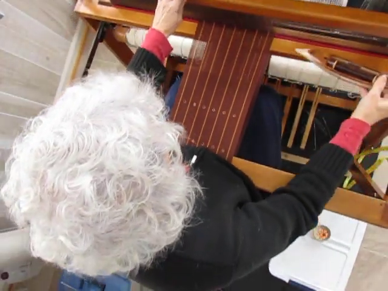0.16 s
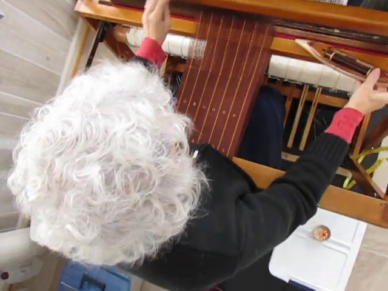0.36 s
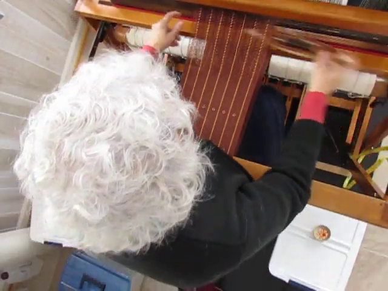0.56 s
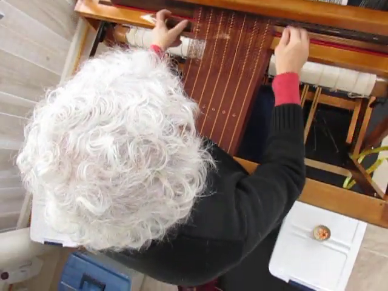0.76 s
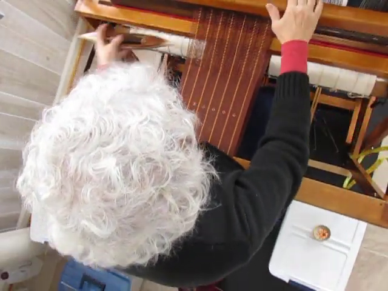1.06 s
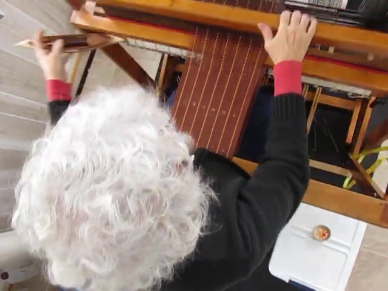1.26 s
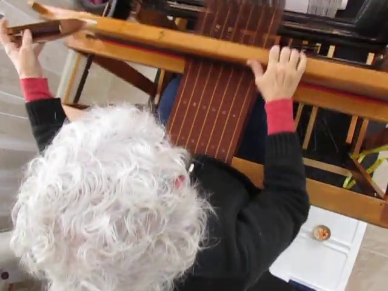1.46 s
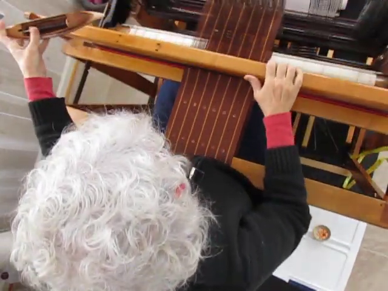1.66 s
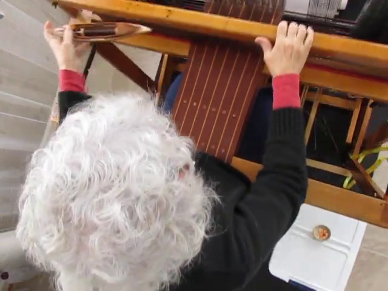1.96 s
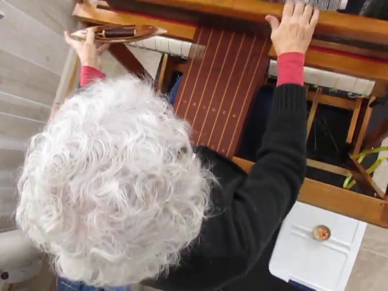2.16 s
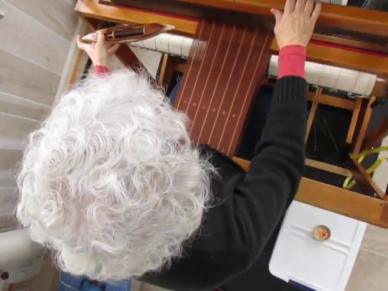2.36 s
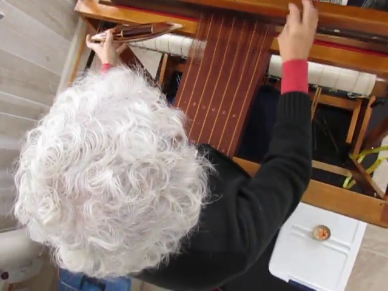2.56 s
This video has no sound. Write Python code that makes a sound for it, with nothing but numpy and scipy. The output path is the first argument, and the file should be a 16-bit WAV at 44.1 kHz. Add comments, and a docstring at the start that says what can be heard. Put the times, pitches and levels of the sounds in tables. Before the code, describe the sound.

Hand weaving on a wooden loom, heard close above in a small lively room: soft thuds, bright shuttle clacks, whirring bobbin, a burst of beater thumps and swishing threads, then ticks and a brief metal squeal.

```python
"""Threads swish and wood scrapes on wood in a small room: a wooden floor loom at work, two microphone ports.
Thuds of beater and treadles ring the frame, joints squeak in narrow noise bands, heddles tick.
The shuttle is thrown from right to left: knocks ring its modes, which are damped and shifted once it is
caught. Its bobbin whirrs in many small taps; later a metal pivot squeals. Shaped noise makes the swish,
scrape, floor rumble and room tone; sparse fading taps make the reverberation of everything else."""
import sys
import numpy as np
from scipy import signal
from scipy.fft import rfft, irfft
from scipy.io import wavfile
from scipy.ndimage import uniform_filter1d

SR = 44100
rng = np.random.default_rng(int(sys.argv[2]) if len(sys.argv) > 2 else 0)


def volts(x):
    """Linear amplitude factor 10**(x/20) for a level x in dB, scalar or array-like."""
    e = np.asarray(x, float) / 20
    return 10 ** e


def wav_out(sig):
    """Save sig, one row per channel (or a flat mono array), as 16-bit PCM at SR to the path in sys.argv[1]."""
    wavfile.write(sys.argv[1], SR, np.round(np.clip(np.atleast_2d(sig).T, -1, 1) * 32767).astype(np.int16))


N = 119070

# likeness of the left and right ports: f/Hz, likeness (1 = identical)
LIKENESS = [(60, 0.88), (300, 0.87), (700, 0.69), (2000, 0.13), (6000, 0.032), (14000, 0.18)]
# modes of the shuttle damped and shifted by the hand: f/Hz, level/dB, t60/s
HELD_MODES = [(1430, -10.5, 0.013), (2392, -0.5, 0.023), (2560, 7, 0.024), (3440, 3.5, 0.014),
              (4230, -4.5, 0.042), (4995, 3, 0.046), (6440, -3, 0.021), (8160, -5, 0.026),
              (11960, -1.5, 0.058)]
CAUGHT_S = 1.05  # from here the hand holds the shuttle


def evened(x):
    """Scales to rms 1."""
    return x / np.sqrt(np.mean(x ** 2) + 1e-20)


def read(points, hz):
    """Reads a spectrum on a log-frequency axis."""
    f, value = np.transpose(points)
    return np.interp(np.log(hz + 1), np.log(f + 1), value)


def curve(rows, column=1):
    """Reads a control curve at every sample."""
    rows = np.array(rows)
    return np.interp(np.arange(N) / SR, rows[:, 0], rows[:, column])


def add(mix, s, sound, pan_db=0):
    """Places a sound, positive pan to the left; the farther port hears it softer and later."""
    samples_per_db = 1.15  # arrival lag between the ports
    for side, sign in enumerate((1, -1)):
        lag = max(-sign * pan_db * samples_per_db, 0)
        part = mix[side, round(s * SR + lag):][:len(sound)]
        part += volts(sign * pan_db / 2) * sound[:len(part)]


def paired(left, other, hz):
    """Blends two independent spectra into a stereo pair with the likeness of the two ports."""
    same = np.clip(read(LIKENESS, hz), -1, 1)[:, None]
    return np.array([left, same * left + np.sqrt(1 - same ** 2) * other])


def hiss(colour, patchy_db, grit_db):
    """Friction and air as stereo noise with drifting patches and short wide flickers."""
    size = 4096 if colour[-1][0] < 1000 else 512  # long windows resolve bass colours
    hop = size // 4
    frames, hz = N // hop + 5, np.fft.rfftfreq(size, 1 / SR)
    a, b, c, d, patches = rng.standard_normal((frames, len(hz), 5)).T
    patches = uniform_filter1d(patches, size=9, axis=0)
    patches = evened(uniform_filter1d(patches, size=10, axis=1))
    z = paired(a + 1j * b, c + 1j * d, hz)
    flicker_db = grit_db * rng.standard_normal(frames)
    z *= volts(read(colour, hz)[:, None] + patchy_db * patches + flicker_db)
    return evened(signal.istft(z, nperseg=size, noverlap=size - hop)[1][:, :N])


def swish():
    """Threads rub through reed and heddles: bright noise."""
    # strength of the rubbing: t/s, level/dB
    strength = [(0, -34.5), (.06, -38), (.12, -34), (.19, -41), (.4, -44), (.45, -32.5), (.58, -48),
                (.63, -35.5), (.8, -54), (.9, -55), (1.06, -68.5), (1.2, -51), (1.42, -50), (1.51, -34.5),
                (1.58, -20), (1.65, -24.5), (1.69, -32.5), (1.775, -23), (1.8, -27), (1.86, -37),
                (1.92, -35), (1.96, -28.5), (2.04, -38.5), (2.06, -27), (2.12, -33.5), (2.28, -38),
                (2.58, -44), (2.7, -41.5)]
    # spectrum of thread friction: f/Hz, relative level per Hz/dB
    colour = [(2000, -19), (3500, -16), (6000, -5.5), (9000, -2), (11500, -1), (14000, -10), (16000, -21)]
    return volts(curve(strength)) * hiss(colour, 0.64, 2.56)


def scrape():
    """Wood slides on wood: noise mostly below the upper treble."""
    # strength of the sliding: t/s, level/dB
    strength = [(0, -39.5), (.19, -47), (.22, -36.5), (.33, -37.5), (.41, -46), (.45, -34.5), (.62, -40.5),
                (.75, -41), (.9, -59), (1.25, -43.5), (1.4, -39), (1.44, -28), (1.5, -34.5), (1.6, -26),
                (1.72, -34.5), (1.77, -29.5), (1.8, -40), (1.93, -42.5), (1.96, -33), (2.1, -35.5),
                (2.26, -45), (2.36, -31), (2.47, -43.5), (2.58, -46), (2.7, -41.5)]
    # spectrum of wood friction: f/Hz, relative level per Hz/dB
    colour = [(150, -13), (300, -3.5), (600, -10), (1300, -8), (2500, -8.5), (5000, -11.5), (9000, -22.5)]
    return volts(curve(strength)) * hiss(colour, 1.8, 1.0)


def rumble():
    """The frame rocks on the floor: noise in the bass."""
    # strength of the rocking: t/s, level/dB
    strength = [(0, -46), (.19, -46), (.26, -37), (.4, -42.5), (.48, -39.5), (.62, -47.5), (.69, -38.5),
                (.86, -68), (1.05, -54.5), (1.35, -61), (1.45, -40), (1.6, -34.5), (1.78, -42), (1.9, -52),
                (1.97, -39), (2.2, -46), (2.31, -32), (2.45, -45.5), (2.7, -52)]
    # spectrum of the floor rumble: f/Hz, relative level per Hz/dB
    colour = [(10, -12.5), (25, -1.5), (65, 2.5), (100, -4.5), (135, 0.5), (190, -25), (300, -54)]
    return volts(curve(strength)) * hiss(colour, 0.68, 2.6)


def room_tone():
    """The steady hush of the place, heaviest in the bass."""
    # spectrum of the hush: f/Hz, relative level per Hz/dB
    colour = [(20, -18), (40, 15), (140, -20.5), (250, -17), (2000, -62), (16000, -60)]
    return volts(-57) * hiss(colour, 0.57, 0.52)


def tilted(size, tilt_db, centre_hz):
    """Noise sloping in dB per octave, with little bass far below its centre and a rolled-off top."""
    hz = np.fft.rfftfreq(size, 1 / SR) + 1
    slope = volts(tilt_db * np.log2(hz / centre_hz))
    bass_cut = 1 + (0.44 * centre_hz / hz) ** 6
    top_cut = 1 + (hz / min(13000, 5 * centre_hz)) ** 8
    return evened(irfft(rfft(rng.standard_normal(size)) * slope / bass_cut / top_cut))


def blow(modes, tilt_db, chatter_s, centre_hz, crack_db, crack_s):
    """A first contact and a chatter of smaller ones ring the modes and crack; a long chatter starts softly."""
    t = np.arange(8192) / SR
    spot_db = 5.5  # spread of mode levels with the spot struck
    ring = np.zeros(len(t))
    for hz, db, t60 in modes:
        spot, detune = rng.standard_normal(2)
        mode_db = db + spot_db * spot + tilt_db * np.log2(hz / centre_hz)
        ring += volts(mode_db - 60 * t / t60) * np.sin(2 * np.pi * hz * (1 + 0.0045 * detune) * t)
    # toneless crack against the ring: a slow fade and one five times faster
    fade = volts(crack_db - 60 * t / crack_s) + volts(crack_db - 300 * t / crack_s)
    crack = tilted(len(t), tilt_db - 2.0, centre_hz) * fade * np.std(ring[:200])
    u = t / max(chatter_s, 2e-4)
    chance = rng.random(len(t)) < .06
    contacts = 0.82 * rng.standard_normal(len(t)) * chance * (u + 0.38) * np.exp(-u)
    contacts[0] = 1.43 * np.exp(-chatter_s * centre_hz / 8)
    band = signal.butter(5, [modes[0][0] * 0.86, 13800], "band", fs=SR, output="sos")
    sound = signal.sosfilt(band, signal.fftconvolve(contacts, ring + crack))
    return sound / abs(sound).max()


def thuds():
    """Beater and treadles thud into the frame and ring its low wooden modes."""
    # blows: t/s, peak level/dB, brightness/dB per octave
    blows = [(0.041, -29, -19), (.212, -24.5, 2), (.432, -20.5, -8.5), (.446, -31.5, -7), (.666, -23, 2),
             (.688, -32, -4.5), (1.407, -21.5, 0), (1.519, -15, -1), (1.544, -19, -4), (1.589, -28.5, -1),
             (1.64, -27, -13.5), (1.955, -30, -0.5), (2.178, -32.5, -6), (2.284, -24.5, 4.5),
             (2.684, -27, -9)]
    # modes of the frame: f/Hz, level/dB, t60/s
    frame_modes = [(264, -14, 0.053), (288.6, 3, 0.14), (343, -6, 0.06), (425, -3.5, 0.034),
                   (518, -3.5, 0.1), (798.4, -1, 0.13), (1122, -10, 0.024), (1185, -2.5, 0.1),
                   (1238, 0.5, 0.09)]
    out = np.zeros((2, N))
    for s, db, tilt_db in blows:
        thud = blow(frame_modes, tilt_db, chatter_s=0.0075, centre_hz=510, crack_db=2.4, crack_s=0.065)
        add(out, s, volts(db) * thud)
    return out


def whistle(hz, width_hz, size):
    """Noise in a narrow band around the curve hz."""
    r = np.exp(-np.pi * width_hz / SR)
    settle = 999  # samples for the resonance to build up
    noise = rng.standard_normal((size + settle, 2)) @ [1, 1j]
    slow = signal.lfilter([1], [1, -2 * r, r * r], noise)[settle:]
    phase = 2 * np.pi * np.cumsum(hz * np.ones(size)) / SR
    return evened((slow * np.exp(1j * phase)).real)


def squeaks():
    """Dry joints slip in short fuzzy tones that swell and fade, a little to the left."""
    # squeaks and groans: start t/s, length/s, f/Hz, level/dB
    slips = [(0.044, 0.021, 2097, -43), (0.516, 0.051, 13500, -44), (1.16, 0.081, 520, -48.5),
             (1.272, 0.076, 295.5, -31.5), (1.581, 0.019, 5390, -29.5), (1.584, 0.054, 4586, -28.5),
             (1.643, 0.062, 4490, -32.5), (1.649, 0.041, 6820, -35.5), (1.716, 0.04, 7350, -35),
             (2.05, 0.046, 8570, -29.5), (2.21, 0.045, 3750, -41.5), (2.216, 0.04, 7540, -38.5),
             (2.607, 0.031, 10370, -39)]
    out = np.zeros((2, N))
    for s, length, hz, db in slips:
        size = round(length * SR)
        swell = np.sin(np.pi * (np.arange(size) / size) ** 0.59)
        add(out, s, volts(db) * whistle(hz, 0.038 * hz, size) * swell, .8)  # width is a share of the pitch
    return out


def tick(tilt_db, t60):
    """A sharp click with a short jingling tail of many small wires."""
    t = np.arange(8192) / SR
    fade = volts(-60 * t / 0.0029) + 1.205 * volts(-60 * t / max(t60, .005))
    return 0.2 * tilted(len(t), tilt_db, 2510) * fade


def ticks():
    """Metal heddles and shafts tick, slightly to the left."""
    # ticks: t/s, level/dB, brightness/dB per octave, jingle t60/s
    clicks = [(0.2106, -13, 0.8, 0.093), (0.289, -15, -5, 0.032), (1.469, -9.5, 12, 0.03),
              (1.8777, -22, -2.5, 0.11), (1.949, -14.5, 2.5, 0.098), (2.0844, -14, -2, 0.054),
              (2.2844, -18, -3, 0.057), (2.3233, -2, -1.5, 0.045), (2.355, -5, -2.5, 0.068),
              (2.3914, -10, -3, 0.054)]
    out = np.zeros((2, N))
    for s, db, tilt_db, t60 in clicks:
        add(out, s, volts(db) * tick(tilt_db, t60), .6)
    return out


def knocks():
    """Shuttle and bobbin knock, ringing freely in flight from right to left, then damped in the hand."""
    # knocks: t/s, peak level/dB, brightness/dB per octave, chatter/s
    hits = [(0.4837, 0.5, -13.5, 0.00065), (0.5087, -10, -2, 0.0022), (0.6595, -11, -5, 0.0006),
            (0.665, -6.5, 1, 0.0033), (0.6752, -6, 0, 0.0032), (0.7065, -6, -6.5, 0.00116),
            (.712, -3, 6.5, 0.0016), (0.7218, -11, -15, 0.00081), (0.7466, -7.5, 3, 0.0032),
            (0.772, -11.5, -5, 0.0022), (0.781, -11.5, 6, 0.0021), (1.074, -1, -1, 0.00062),
            (1.097, -14.5, -5, 0.0036), (1.109, -10, 3, 0.0022), (1.1338, -4.5, -5, 0.00083),
            (1.1642, -2.5, -3.5, 0.00042), (1.205, -11, 0, 0.0023), (1.267, -7.5, -3, 0.0012),
            (1.3061, -5, -1.5, 0.00024), (1.331, -5, 5, 0.005), (1.4364, -8, -6.5, 0.00057)]
    # modes of the shuttle in flight: f/Hz, level/dB, t60/s
    flight_modes = [(1183, -7.5, 0.073), (1965, -7, 0.03), (2550, 2.5, 0.054), (2661, 4.5, 0.082),
                    (3870, -4, 0.051), (4290, 5.5, 0.042), (5980, 6, 0.052), (5940, 5.5, 0.085),
                    (7913, 11, 0.048), (11300, -23, 0.025), (11870, 11, 0.045)]
    # path across the microphone: t/s, left-right level/dB
    path = [(.45, -2.5), (.8, 0.63), (1.05, 3)]
    pan_db = curve(path)
    out = np.zeros((2, N))
    for s, db, tilt_db, chatter_s in hits:
        modes = flight_modes if s < CAUGHT_S else HELD_MODES
        knock = blow(modes, tilt_db, chatter_s, centre_hz=3850, crack_db=4.5, crack_s=0.018)
        add(out, s, volts(db) * knock, pan_db[round(s * SR)])
    return out


def whirr():
    """The spinning bobbin taps the held shuttle in many small uneven knocks as it pays out yarn."""
    # strength of the whirr: t/s, level/dB
    strength = [(1.05, -45), (1.072, -44), (1.095, -21), (1.115, -26), (1.128, -36), (1.15, -30.5),
                (1.2, -26), (1.25, -32), (1.3, -31), (1.34, -23), (1.4, -34), (1.47, -67)]
    taps_per_s, spots = 640, 6
    out = np.zeros((2, N))
    for k in range(spots):
        force = volts(4 * np.minimum(rng.exponential(1, N), 3))
        taps = (rng.random(N) < taps_per_s / spots / SR) * force
        knock = blow(HELD_MODES, 0.82, chatter_s=0.00053, centre_hz=5100, crack_db=4.5, crack_s=0.018)
        add(out, 0, signal.oaconvolve(taps, knock)[:N], 1.0 * (k - 1.5))
    started = np.arange(N) / SR > strength[0][0]
    return evened(out) * volts(curve(strength)) * started


def squeal():
    """A metal pivot sings one high wavering tone: a sine and a narrow band of noise."""
    # course of the squeal: t/s, f/Hz, level/dB
    course = [(2.295, 8530, -50), (2.31, 8500, -26), (2.39, 8550, -25), (2.41, 8650, -30.5),
              (2.45, 8510, -23), (2.5, 8550, -32), (2.62, 8570, -63)]
    pure = 0.28  # share of the sine
    hz = curve(course)
    sine = np.sqrt(2) * np.sin(2 * np.pi * np.cumsum(hz) / SR)
    tone = pure * sine + (1 - pure) * whistle(hz, 230, N)
    t = np.arange(N) / SR
    sounding = (t > course[0][0]) * (t < course[-1][0])
    out = np.zeros((2, N))
    add(out, 0, evened(tone) * volts(curve(course, column=2)) * sounding, -.8)
    return out


def room(x):
    """Sparse taps of random sign, each band dying at its own speed; the bass is alike on both sides."""
    # decay of the room: f/Hz, t60/s
    decay = [(150, 0.17), (600, 0.62), (2000, 0.39), (6000, 0.29), (14000, 0.094)]
    taps = np.zeros((2, SR))
    at = np.arange(80, SR - 20, 20) + rng.integers(0, 20, (2, (SR - 81) // 20))
    np.put_along_axis(taps, at, rng.choice([-1., 1.], at.shape), 1)
    hz, t, z = signal.stft(taps, SR, nperseg=256)
    fade = volts(-60 * t / read(decay, hz)[:, None])
    tail = signal.istft(paired(z[0], z[1], hz) * fade, SR, nperseg=256)[1]
    return signal.fftconvolve(x, tail / np.linalg.norm(tail[0]), axes=1)[:, :N]


def scene():
    """Knocks, ticks, squeaks and squeal sound dry and through the room; the noise beds are dry."""
    beds = swish() + scrape() + rumble() + room_tone()
    loom = thuds() + squeaks() + ticks() + knocks() + whirr() + squeal()
    return loom + volts(-4) * room(loom) + beds


def band_limit(x):
    """A steep low-pass at the top of the band."""
    return signal.sosfilt(signal.butter(12, 16170, fs=SR, output="sos"), x)


def record(dry):
    """The two microphone ports differ a little in colour; the band ends at 16.1 kHz and peaks clip."""
    # microphone balance: f/Hz, left-right level/dB
    balance = [(60, 1), (700, 0.7), (2500, -1.5), (8000, 1.5), (14000, 0.7)]
    hz = np.fft.rfftfreq(N, 1 / SR)
    lean_db = read(balance, hz) / 2
    ports = volts(np.array([lean_db, -lean_db])) * (hz < 16100)
    mix = irfft(rfft(dry) * ports, N)
    return band_limit(np.clip(mix, -1, 1))


dry = scene()
out = record(dry)
wav_out(out)
```